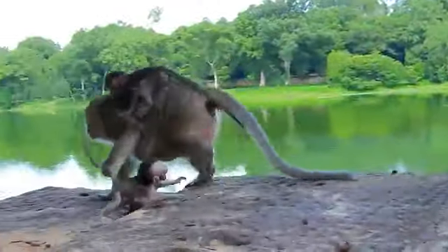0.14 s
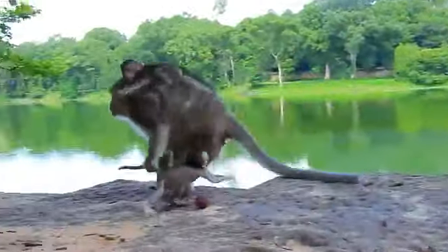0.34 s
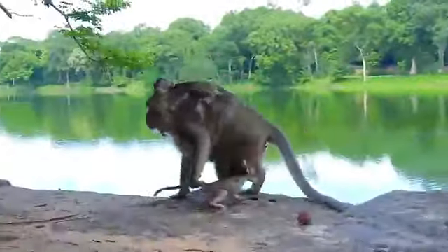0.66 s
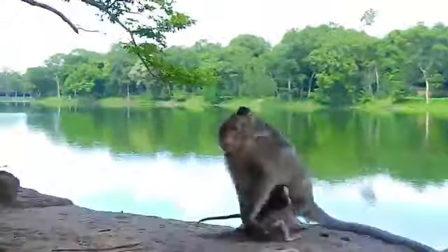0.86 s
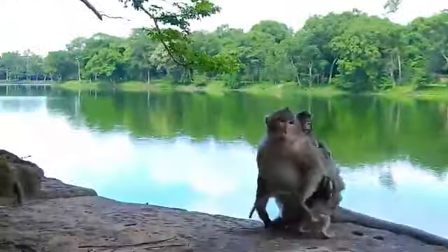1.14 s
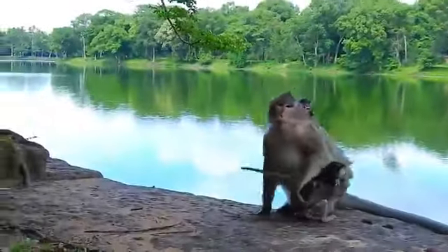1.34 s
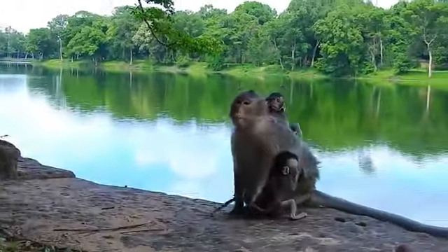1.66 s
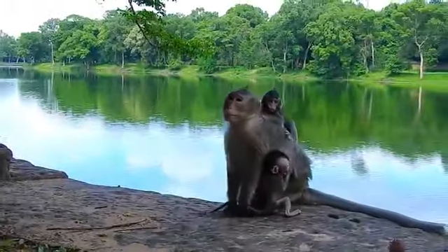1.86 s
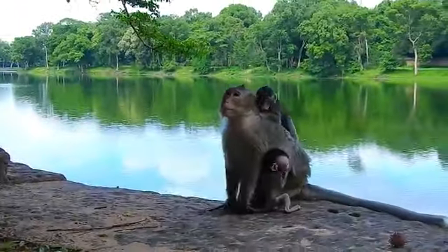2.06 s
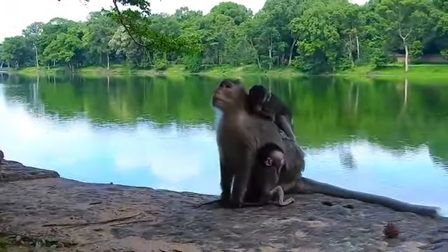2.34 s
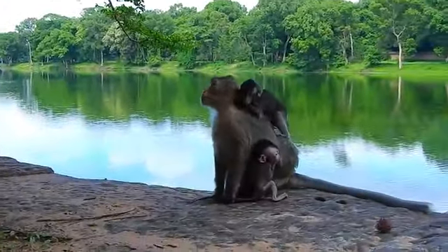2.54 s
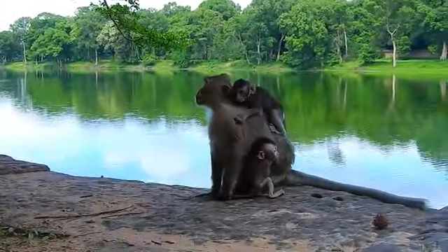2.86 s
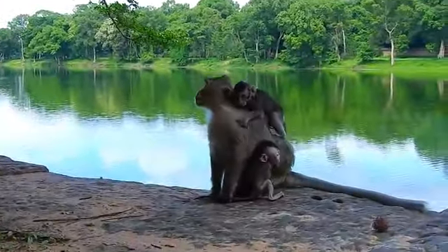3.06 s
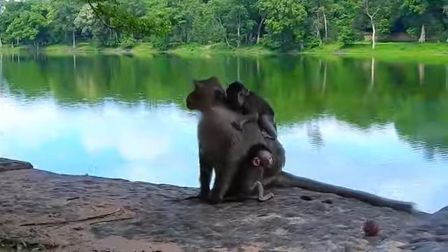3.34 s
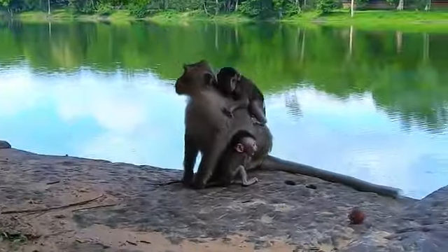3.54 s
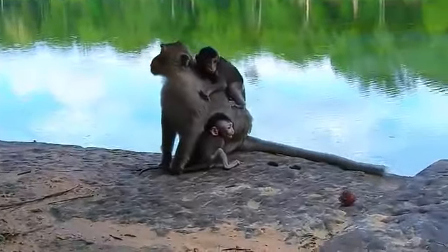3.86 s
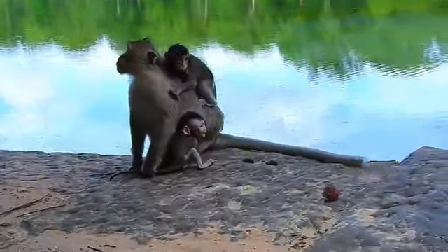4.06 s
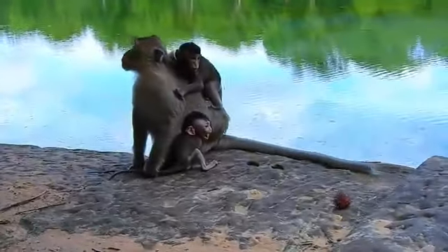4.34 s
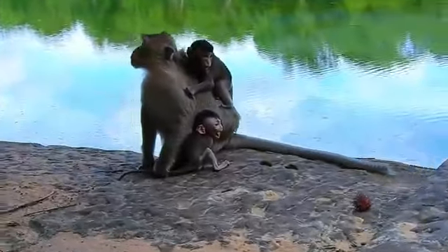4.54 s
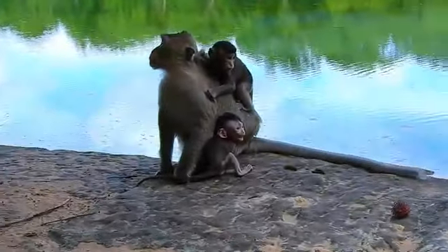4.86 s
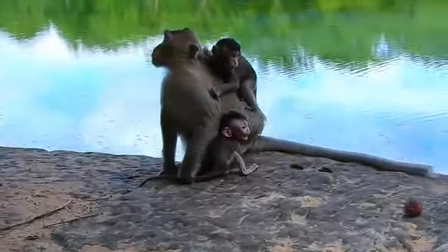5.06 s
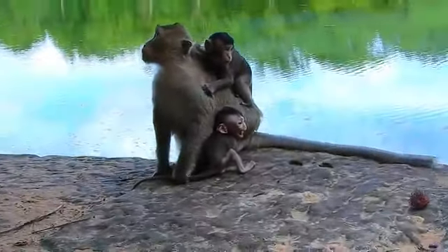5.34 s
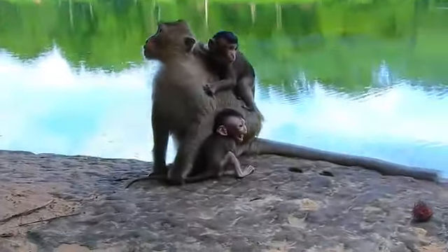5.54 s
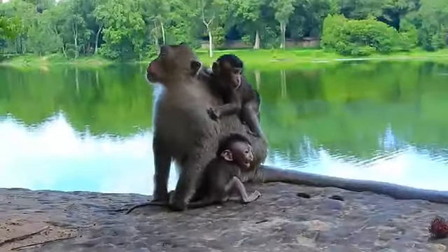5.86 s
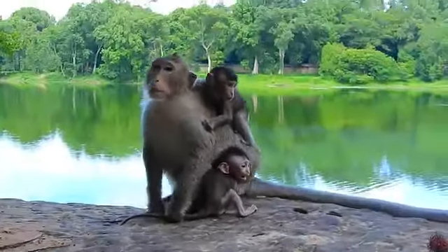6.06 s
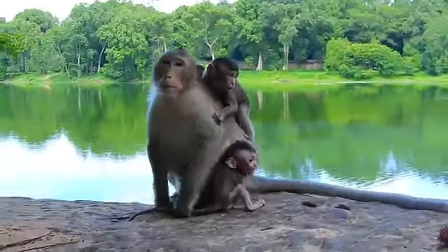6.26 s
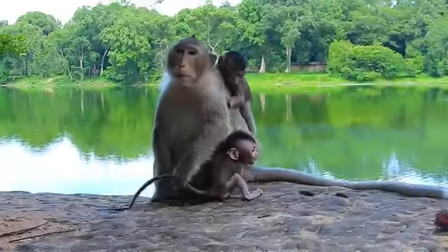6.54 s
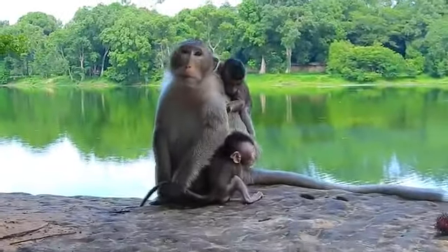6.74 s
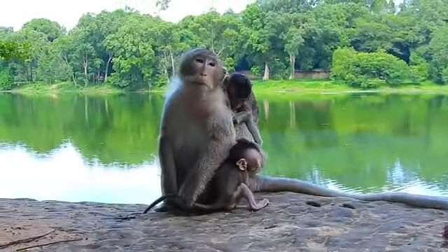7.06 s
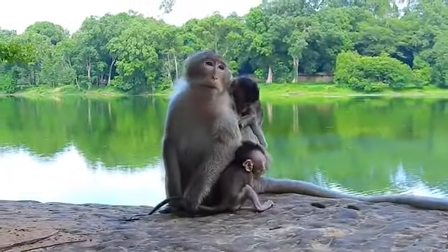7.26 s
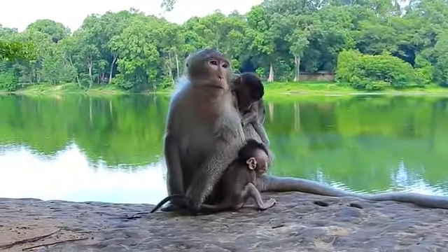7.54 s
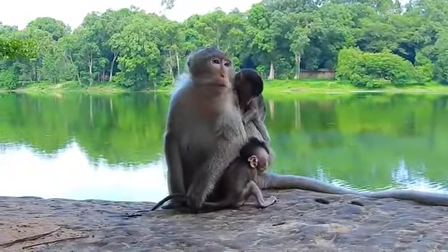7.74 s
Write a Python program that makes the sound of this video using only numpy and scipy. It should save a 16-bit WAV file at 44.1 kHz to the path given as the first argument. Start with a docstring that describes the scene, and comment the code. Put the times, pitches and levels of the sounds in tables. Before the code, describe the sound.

Piercing infant monkey cries dominate: a thin opening squeal, a cluster of hoarse shrieks, a swooping cry, then a soft coo and two long breaking screams. Afterwards the animal calms into tiny yelps and a longer wavering coo, with a light tap near the end. Scuffs and bumps on stone come mostly early. Open air beside water, handheld camera microphone, brief reflections and low rumble.

```python
"""A shrill whistled scream comes first: an infant macaque on a stone bank by a pond, with coos and yelps in between.
Each scream is a nearly pure tone whose pitch heads for an aim, sags and drops; it carries less when very high.
Breaks, rasps and hisses add a lower tone or grainy noise. Coos and yelps are stacks of harmonics with some air.
Noise bursts make the monkeys' scuffs and bumps on the stone; a bird gives two thin notes over a low rumble.
The ground reflects each cry at once, and the trees round the water answer a moment later."""
import sys
import numpy as np
from scipy import signal
from scipy.fft import rfft, irfft, next_fast_len
from scipy.io import wavfile
from scipy.ndimage import uniform_filter1d

SR = 44100
rng = np.random.default_rng(int(sys.argv[2]) if len(sys.argv) > 2 else 0)


def master_out(mix):
    """Clip the mix to full scale and print it as 16-bit PCM to the path in sys.argv[1]."""
    frames = np.transpose(np.atleast_2d(mix))
    ceiling = np.clip(frames, -1, 1)
    pcm = np.round(ceiling * 32767).astype(np.int16)
    wavfile.write(sys.argv[1], SR, pcm)


N = 348831  # length of the scene in samples

# hoarse rasps of the voice: start_s, end_s, centre_hz, level_db
RASPS = [(0.089, 0.112, 3200, -41.5), (0.419, 0.441, 4300, -31.5), (0.742, 0.774, 7180, -49),
         (1.122, 1.163, 7200, -29), (1.246, 1.313, 6700, -31), (1.363, 1.379, 3270, -29.5),
         (2.003, 2.029, 3950, -32), (3.093, 3.128, 3695, -28.5), (3.856, 3.884, 3900, -22),
         (5.77, 5.809, 5400, -30), (7.1, 7.2, 3050, -56)]
# the top of a scream breaks, and the pitch drops a step: start_s, end_s, harshness (0 to 1)
BREAKS = [(4.47, 4.53, 0), (4.528, 4.575, 0.4), (4.611, 4.632, 0.3), (4.663, 4.685, 0.1),
          (4.718, 4.907, 0.12), (5.296, 5.332, .15), (5.357, 5.392, 0.7), (5.418, 5.448, 0.7),
          (5.554, 5.577, 0.7), (5.61, 5.636, 1), (5.716, 5.81, 0)]


def amp(db):
    """Decibels to a plain multiplier."""
    return 10 ** (np.asarray(db) / 20)


def unit(x):
    """Scale x to an rms of 1."""
    return x / np.sqrt(np.mean(x ** 2) + 1e-20)


def along(points, hz):
    """Read (Hz, value) points at hz, on a log frequency axis."""
    f, v = np.transpose(points)
    return np.interp(np.log(hz + 1e-9), np.log(f), v)


def wobble(rate, size):
    """A smooth random curve with rate knots a second."""
    curve = signal.resample(rng.standard_normal(2048), 16384)  # 8 points per knot
    position = np.arange(size) * (8 * rate / SR)
    return np.interp(position, np.arange(len(curve)), curve)


def filtered(x, response):
    """Multiply the spectrum of x by a response of frequency."""
    size = x.shape[-1]
    m = next_fast_len(size + 4096)
    spectrum = rfft(x, m) * response(np.fft.rfftfreq(m, 1 / SR))
    return irfft(spectrum, m)[..., :size]


def dull(hz, edge_hz, order=14):
    """A steep roll-off above an edge."""
    return 1 / np.sqrt(1 + (hz / edge_hz) ** (2 * order))


def noise(spectrum, size, centre=1, edge_hz=8300):
    """Coloured noise of rms 1; with a centre, the spectrum is in multiples of it."""
    m = next_fast_len(max(size, SR // 2))
    hz = np.fft.rfftfreq(m, 1 / SR)
    colour = amp(along(spectrum, hz / centre)) * dull(hz, edge_hz)
    return unit(irfft(rfft(rng.standard_normal(m)) * colour, m)[:size])


def patchy(x, depth_db=5.0):
    """Narrow bands of x swell and sink on their own."""
    z = signal.stft(np.pad(x, (0, 512)), nperseg=256)[2]
    field = uniform_filter1d(rng.standard_normal(z.shape), size=3, axis=0)
    field = uniform_filter1d(field, size=7, axis=1)
    return signal.istft(z * amp(depth_db * unit(field)), nperseg=256)[1][:len(x)]


def grainy(x):
    """Noise made lumpy in time and patchy in colour, at rms 1."""
    lumps_db = 2 * wobble(450, len(x)) + 1.5 * wobble(80, len(x))
    return unit(patchy(x) * amp(lumps_db / 20 * 20))


def gate(start, end, edge):
    """The times of a sound and its envelope, with soft edges outside start and end."""
    t = np.arange(int(max(start - edge, 0) * SR), int((max(end, start) + edge) * SR)) / SR
    ramp = np.minimum(t - start + edge, end + edge - t) / edge
    return t, np.sin(np.pi / 2 * np.clip(ramp, 0, 1)) ** 2


def follow(rows, t):
    """Each column after the time, read at the times t."""
    s, *cols = np.transpose(rows)
    return [np.interp(t, s, c) for c in cols]


def add(track, t, x):
    """Mix x in at its times."""
    part = track[round(t[0] * SR):][:len(x)]
    part += x[:len(part)]


def spell(rows, t):
    """The value of each (start, end, value) row inside its span, 0 outside, with soft edges."""
    inside = np.zeros(N)
    for start, end, value in rows:
        times, fade = gate(start, end, 0.0045)
        add(inside, times, value * fade)
    return np.clip(inside[(t * SR).astype(int)], 0, 1)


def arch(t, start, end, first, aim, last, climb, drop, sag):
    """The pitch of a scream: it heads for an aim, sags as breath runs out and moves ever faster at the end."""
    t = np.clip(t, start, end)
    approach = (aim - first) * np.exp((start - t) / climb)
    ending = (aim - sag * (end - start) - last) * np.exp((t - end) / drop)
    return aim - sag * (t - start) - approach - ending


def screams(step=0.09, choke_db=-5, flutter_db=3, half_db=-4, slip=0.71, drift=0.0079, fifth_db=-20):
    """A nearly pure whistle; in a break its pitch steps down, and when high it gains a tone an octave below."""
    # whistled screams: start_s, end_s, first_hz, aim_hz, last_hz, climb_s, drop_s, sag_hz_per_s,
    # then effort_db at each of the four stages
    scream_rows = [(0, 0.591, 11750, 11850, 11650, 0.064, 0.032, 710.5, -24, -20.5, -25, -36),
                   (0.96, 1.13, 10550, 12200, 10860, 0.046, 0.042, 2901, -30, -37, -49, -32),
                   (1.147, 1.208, 7860, 11230, 10100, 0.031, 0.017, 0, -27.5, -27.5, -22, -22),
                   (1.217, 1.381, 9900, 6950, 7050, 0.013, 0.07, 6.5, -21.5, -21.5, -27, -38),
                   (1.631, 2.001, 6300, 11500, 4370, 0.087, 0.021, 4601.5, -43.5, -35.5, -38.5, -21.5),
                   (3.047, 3.107, 2920, 3593, 2400, 0.0087, 0.0087, -1.5, -36, -10.5, -20, -18.5),
                   (3.5, 3.554, 7380, 8330, 6580, 0.012, 0.013, 100, -38, -38, -37.5, -39),
                   (3.559, 3.871, 6110, 13290, 4580, 0.17, 0.027, 10, -36.5, -44, -27, -16),
                   (4.258, 4.904, 5460, 11520, 5900, 0.059, 0.059, 2601, -26.5, -26.5, -15.5, -24),
                   (5.123, 5.811, 7346, 11110, 3800, 0.048, 0.033, 1700, -25, -20.5, -15.5, -21)]
    # onset, top of the climb, hold, final push: share of the scream's length (0 to 1)
    stages = [0, .25, .5, .93]
    # how well the whistle carries at each pitch: pitch_hz, level_db
    carry = [(4000, -8.5), (7200, 0.5), (8800, -11.5), (12000, -24)]
    # a break starts to double the whistle's period between these: low_hz, high_hz
    doubling_hz = [9200, 9600]
    release_db = 9.5  # effort lost after the final push
    kick_db, kick_s = 5.5, 0.0043  # extra effort at the onset, and how fast it fades
    squeal_hz = 11160  # above this the whistle frays into a narrow band of noise
    # unsteadiness of the pitch, as shares of it
    waver, plain_jitter, squeal_jitter, rasp_jitter = .0055, .007, .011, .02

    out = np.zeros(N)
    for start, end, first, aim, last, climb, drop, sag, *effort_db in scream_rows:
        t, fade = gate(start, end, 0.0034)
        size = len(t)
        broken = spell([(a, b, 1) for a, b, _ in BREAKS], t)
        harsh = spell(BREAKS, t)
        rasping = spell([(a, b, 1) for a, b, _, _ in RASPS], t)

        hz = arch(t, start, end, first, aim, last, climb, drop, sag)
        rough_jitter = plain_jitter + rasp_jitter * np.maximum(harsh, rasping)
        jitter = np.where(hz > squeal_hz, squeal_jitter, rough_jitter)
        hz = hz * (1 - step * broken)

        share = (t - start) / (end - start)
        db = np.interp(share, stages + [1], effort_db + [effort_db[-1] - release_db])
        db = db + kick_db * np.exp((start - t) / kick_s) + along(carry, hz) + choke_db * harsh
        doubled = broken * np.interp(hz, doubling_hz, [0, 1])

        hz = hz * (1 + drift * wobble(25, size) + waver * wobble(90, size) + jitter * wobble(1400, size))
        phase = 2 * np.pi * np.cumsum(hz) / SR
        # the octave below gets fuzzier the harsher the break; a faint tone sounds a fifth above the whistle
        slow = phase / 2 + slip * harsh * wobble(900, size)
        half = amp(half_db) * doubled * (np.sin(slow) + amp(fifth_db) * np.sin(phase + slow))
        level = amp(db + flutter_db * wobble(170, size))
        add(out, t, np.sqrt(2) * fade * level * (np.sin(phase) + half))
    return out


def hisses():
    """Air forced past folds that fail to sing: a broad hiss coloured by the mouth."""
    # hoarse hisses through the open mouth: start_s, end_s, level_db
    hiss_rows = [(0, 0.402, -56.5), (0.101, 0.112, -33.5), (0.402, 0.453, -43), (0.501, 0.52, -38.5),
                 (0.54, 0.604, -38.5), (0.618, 0.709, -47.5), (1.117, 1.159, -34), (1.24, 1.342, -48),
                 (1.978, 2.02, -39), (7.156, 7.249, -49), (7.446, 7.495, -50)]
    # colour of the hiss: frequency_hz, level_db
    hiss_shape = [(1500, -19), (3700, -11.5), (4500, 1.5), (5600, 1), (7200, 5), (10000, -12.5)]
    out = np.zeros(N)
    for start, end, db in hiss_rows:
        t, fade = gate(start, end, (end - start) / 4)
        add(out, t, amp(db) * fade * grainy(noise(hiss_shape, len(t))))
    return out


def background(side_db=-15, rustle_db=4):
    """A low outdoor rumble that slowly changes level, and the rustle of shifting animals."""
    # level of fur and feet shifting: time_s, level_db
    shuffle = [(.15, -61), (.5, -54), (.8, -65.5), (1.3, -58), (2.4, -75.5), (4.6, -67), (5.6, -63.5),
               (6.05, -72.5), (6.6, -61), (7.8, -83)]
    # level of the low rumble: time_s, level_db
    rumble = [(0, -79), (1.15, -60), (2.3, -74), (4.6, -64.5), (7.8, -74.5)]
    # colour of the rumble: frequency_hz, relative level_db_per_hz
    air = [(35, -30.5), (58, 0.5), (140, 0.5), (350, -14.5), (9000, -43)]
    # colour of the rustle: frequency_hz, relative level_db_per_hz
    fur = [(90, 0), (350, -12), (1000, 6), (2500, -1), (4500, -17.5)]
    t = np.arange(N) / SR
    level_db, = follow(shuffle, t)
    air_db, = follow(rumble, t)
    rustle = amp(level_db + rustle_db * wobble(25, N))
    mid, side = [amp(air_db) * noise(air, N) + rustle * noise(fur, N) for _ in range(2)]
    return np.array([mid + amp(side_db) * side, mid - amp(side_db) * side])


def rasps():
    """Chaotic folds, in a rasp or a break: a grainy band with a weaker band above."""
    # colour of a rasp: multiple of the centre, level_db
    rasp_shape = [(.25, -46), (.65, -26), (.9, 3), (1.08, 13.5), (1.45, -15), (1.8, -12), (3, -49.5)]
    # the band of noise in a fully harsh break, near half the whistle's pitch
    break_hz, break_db = 5130, -29
    rows = list(RASPS)
    for start, end, harsh in BREAKS:
        rows.append((start, end, break_hz, break_db + 20 * np.log10(harsh + 1e-6)))
    out = np.zeros(N)
    for start, end, hz, db in rows:
        t, fade = gate(start, end, (end - start) / 4)
        add(out, t, amp(db) * fade * grainy(noise(rasp_shape, len(t), hz)))
    return out


def scuffs(grit_db=3, t60_per_rise=5):
    """Hands and feet brush the stone: gritty bursts that swell and die without ringing."""
    # scuffs and bumps on the stone: peak_time_s, peak_db, centre_hz, rise_s (time to gain 10 dB)
    scuff_rows = [(.267, -21, 2230, 0.0015), (0.28, -20, 4040, 0.001), (0.578, -35, 1930, 0.0055),
                  (0.916, -40, 1550, 0.008), (0.952, -38, 1180, 0.0051), (0.987, -34, 1220, 0.0039),
                  (1.104, -30, 2870, 0.0053), (1.119, -26, 1575, 0.011), (1.285, -33, 1950, 0.035),
                  (1.592, -40, 1480, 0.006), (1.863, -28, 910, 0.014), (4.61, -40, 545.4, 0.0044),
                  (4.996, -44, 7000, 0.0012), (5.183, -38, 2920, 0.02), (5.336, -42.5, 785, 0.004),
                  (5.652, -33, 959, 0.0025), (6.136, -41, 1900, 0.011), (6.44, -45.5, 1810, 0.024),
                  (6.612, -50, 3050, 0.014), (6.641, -44, 740, 0.014), (7.634, -30.5, 6000, 0.00028)]
    # colour of a scuff: multiple of the centre, level_db
    scuff_shape = [(.1, -18), (.6, -2.5), (1.15, 7), (1.9, -9), (10, -44.5)]
    tap_t60 = .02  # seconds for the quickest tap to fall 60 dB
    out = np.zeros(N)
    for s, db, hz, rise in scuff_rows:
        t60 = tap_t60 + t60_per_rise * rise  # a slow brush also fades slowly
        t, fade = gate(s - 2 * rise, s + t60, 0.0048)
        shape_db = np.where(t < s, 10 * (t - s) / rise, -60 * (t - s) / t60)
        grit = amp(grit_db * wobble(600, len(t)))
        burst = unit(noise(scuff_shape, len(t), hz) * grit)
        add(out, t, fade * amp(db + shape_db) * burst)
    return out


def low_voice(hz, db, upper_db, throat, jitter, flutter_db, flutter_rate, husk_db, waver=0.0038):
    """A harmonic voice through the throat, with a husk of air."""
    k = np.arange(2, 8)[:, None]  # overtone numbers
    size = len(hz)
    hz = hz * (1 + waver * wobble(50, size) + jitter * wobble(900, size))
    phase = 2 * np.pi * np.cumsum(hz) / SR
    unsteady_db = 3.5 * np.array([wobble(31, size) for _ in k])
    gains = amp(along(throat, k * hz) + unsteady_db) * dull(k * hz, 11000)
    upper = (gains * np.sin(k * phase)).sum(0) / np.linalg.norm(gains, axis=0)
    husk = amp(husk_db) * noise([(800, -30.5)] + throat, size)
    voice = amp(db) * np.sin(phase) + amp(upper_db) * (upper + husk)
    return np.sqrt(2) * amp(flutter_db * wobble(flutter_rate, size)) * voice


def yelps():
    """The low voice makes short slides up or down; tension sets pitch and strength."""
    # short yelps: start_s, end_s, first_hz, last_hz, fundamental_db, overtones_db
    yelp_rows = [(2.02, 2.042, 2347, 2020, -50.5, -26.5), (3.099, 3.163, 2235, 1650, -31.5, -25),
                 (3.431, 3.473, 1434, 2354, -46, -43), (3.871, 3.904, 2417, 2043, -36, -21.5),
                 (4.201, 4.25, 1175, 2147, -40.5, -49.5), (5.065, 5.091, 1213, 1970, -43.5, -36),
                 (6.085, 6.124, 1256, 1960, -40.5, -52), (6.35, 6.388, 1165, 1740, -34.5, -48),
                 (6.515, 6.617, 1877, 1780, -42.5, -66.5)]
    # throat with the mouth wide open: frequency_hz, level_db
    open_throat = [(2400, 2.5), (3400, 8), (4400, 8), (5200, -3.5), (6700, -0.5), (10000, -33)]
    bend, peak, fade_db = 1.4, 0.74, 42  # steepest at the high end, loudest just short of it
    out = np.zeros(N)
    for start, end, first, last, db, upper_db in yelp_rows:
        t, fade = gate(start, end, 0.005)
        tension = np.interp(t, [start, end], [0, 1] if last > first else [1, 0])
        hz = min(first, last) + abs(last - first) * tension ** bend
        swell = amp(-fade_db * (tension - peak) ** 2)
        voice = low_voice(hz, db, upper_db, open_throat, jitter=.024,
                          flutter_db=4.5, flutter_rate=110, husk_db=-17)
        add(out, t, fade * swell * voice)
    return out


def coos():
    """Long wavering calls: the low voice follows a drawn pitch and level."""
    # one list of points for each of the two coos: time_s, pitch_hz, fundamental_db, overtones_db
    coo_rows = [
        [(2.48, 1275, -66, -73), (2.508, 1284, -38, -48), (2.55, 1415, -41, -58), (2.65, 1365, -50, -79.5),
         (2.83, 1555, -34.5, -57), (2.88, 1631, -42.5, -55), (2.93, 1649, -39, -52), (3.02, 1877, -55, -50.5),
         (3.042, 2384, -35, -44)],
        [(6.828, 1242, -62.5, -65), (6.855, 1518, -35, -54), (6.9, 1746, -40.5, -47), (6.965, 1664, -33, -44.5),
         (7.06, 1600, -32, -59.5), (7.088, 1634, -40, -59), (7.12, 1653, -25, -37), (7.29, 1706, -42.5, -58.5),
         (7.38, 1661, -22.5, -52.5), (7.47, 1569, -48.5, -43), (7.51, 1484, -33, -50.5),
         (7.552, 1473, -56, -46)],
    ]
    # colour of the throat: frequency_hz, level_db
    coo_throat = [(2400, 8.5), (3500, 5), (4800, -11), (6700, 9.5), (8200, -21), (10000, -36)]
    out = np.zeros(N)
    for rows in coo_rows:
        t, fade = gate(rows[0][0], rows[-1][0], 0.0023)
        hz, db, upper_db = follow(rows, t)
        voice = low_voice(hz, db, upper_db, coo_throat, jitter=0.0054,
                          flutter_db=4.5, flutter_rate=35.15, husk_db=-20.5)
        add(out, t, fade * voice)
    return out


def peeps(waver=0.018, fade_db=12):
    """A bird's short fading whistle: one sine with a slight waver."""
    # thin clean whistles from the bank: start_s, end_s, pitch_hz, starting level_db
    peep_rows = [(6.127, 6.328, 1204, -44), (6.196, 6.225, 6470, -42.5)]
    out = np.zeros(N)
    for start, end, hz, db in peep_rows:
        t, fade = gate(start, end, 0.022)
        level = amp(db - fade_db * (t - start) / (end - start))
        phase = 2 * np.pi * np.cumsum(hz * (1 + waver * wobble(450, len(t)))) / SR
        add(out, t, np.sqrt(2) * level * fade * np.sin(phase))
    return out


def energy(h):
    """Scale each row of an echo to an energy of 1."""
    return h / np.linalg.norm(h, axis=1, keepdims=True)


def outdoors(x, ground_db=-11, bank_db=-16, trees_db=-24, trees_s=0.032, trees_spread=0.12,
             far_db=3, far_s=.212, far_spread=0.021, wide_db=-5.5, thin_hz=2300):
    """Quick reflections off the stone, a thin tail along the bank, and smeared echoes from near and far trees."""
    # how long the bank's tail takes to fall 60 dB: frequency_hz, t60_s
    bank_t60 = [(1600, 0.15), (6500, 0.52), (14000, 0.05)]
    # colour of the trees' echo: frequency_hz, level_db
    tree_colour = [(1700, -17), (2400, 6), (9000, -19)]
    # how differently the two channels hear the reflections: frequency_hz, level_db
    apart = [(250, -19), (1000, 1.5), (4000, 0.5)]
    size = SR * 3 // 4
    t = np.arange(size) / SR

    ground = energy(rng.standard_normal((2, size)) * amp(-60 * t / .08))  # falls 60 dB in 0.08 s

    hz, frames, z = signal.stft(rng.standard_normal((2, size)), SR, nperseg=256)
    decay = amp(-60 * frames / along(bank_t60, hz)[:, None])
    bank = energy(signal.istft(z * decay, SR, nperseg=256)[1][:, :size])
    bank = filtered(bank, lambda hz: 1 - dull(hz, thin_hz, order=4))  # takes out the lows

    near_swell = np.exp(-((t - trees_s) / trees_spread) ** 2 / 2)
    far_swell = np.exp(-((t - far_s) / far_spread) ** 2 / 2)
    trees = energy(rng.standard_normal((2, size)) * (near_swell + amp(far_db) * far_swell))
    trees = filtered(trees, lambda hz: amp(along(tree_colour, hz)))

    # slanting ground reflections reach the two channels differently, so the side signal gets more of them
    answer = amp([[ground_db], [wide_db]]) * ground + amp(bank_db) * bank + amp(trees_db) * trees
    mid, side = signal.fftconvolve(x[None], answer, axes=1)[:, :N]
    side = filtered(side, lambda hz: amp(along(apart, hz)))
    return np.array([x + mid + side, x + mid - side])


def scene():
    """All the sources in the open air."""
    voice = screams() + hisses() + rasps() + yelps() + coos()
    return outdoors(voice + scuffs() + peeps()) + background()


def record(dry):
    """The camera keeps nothing above its band limit of 15300 Hz."""
    return filtered(dry, lambda hz: hz < 15300)


dry = scene()
out = record(dry)
master_out(out)
```